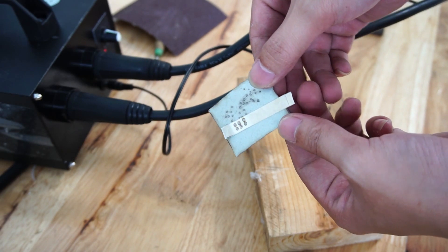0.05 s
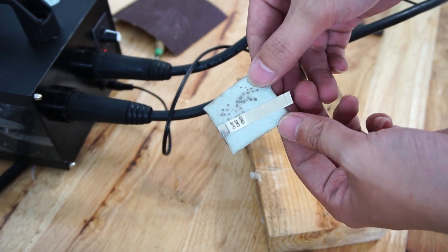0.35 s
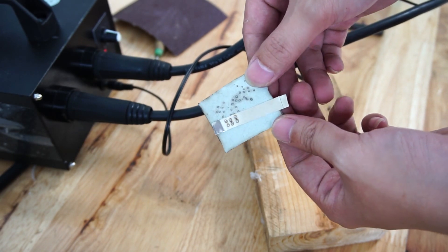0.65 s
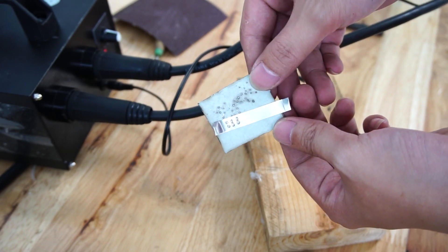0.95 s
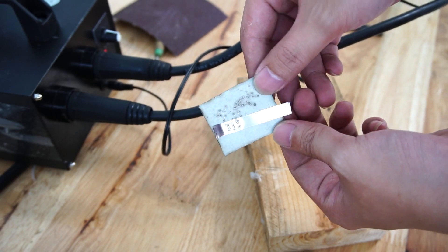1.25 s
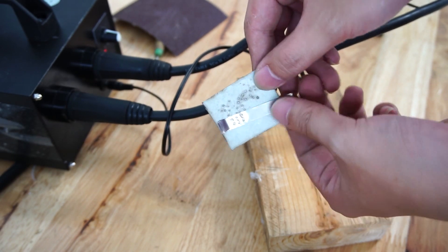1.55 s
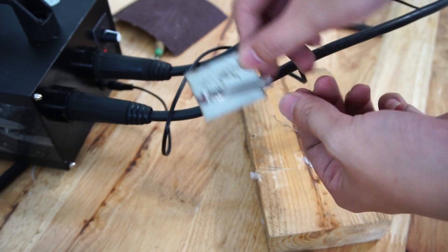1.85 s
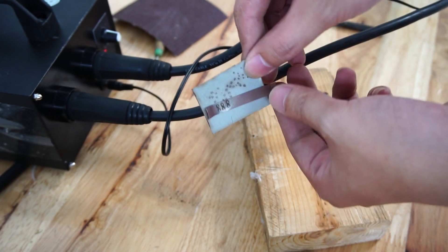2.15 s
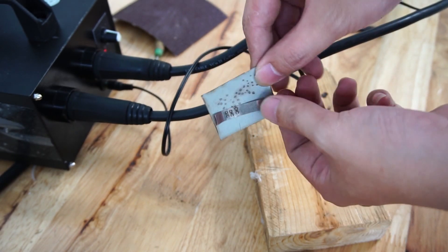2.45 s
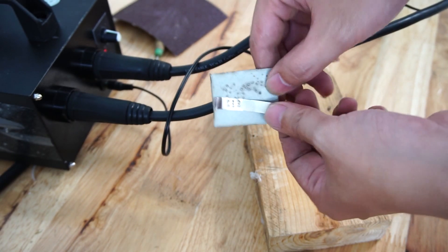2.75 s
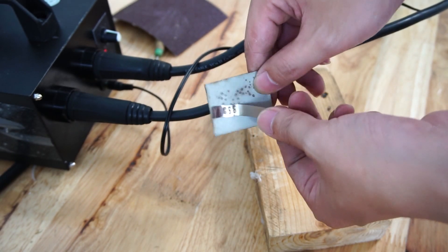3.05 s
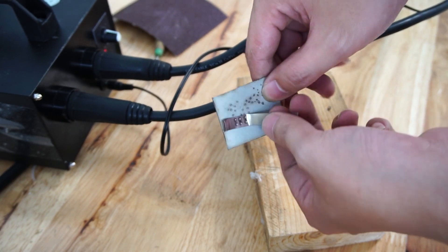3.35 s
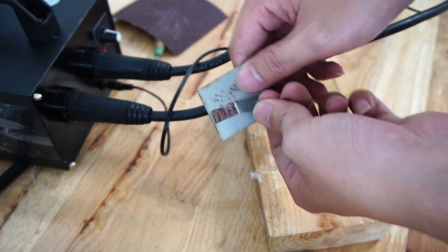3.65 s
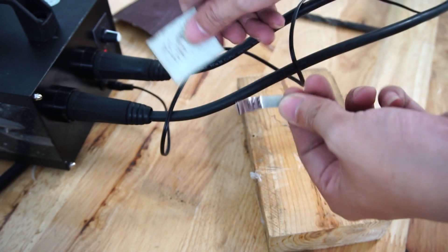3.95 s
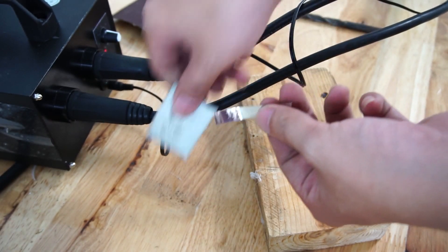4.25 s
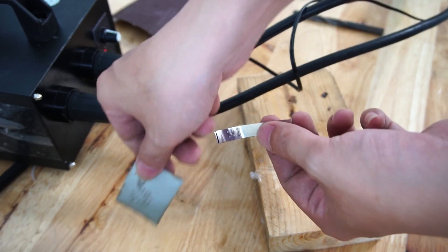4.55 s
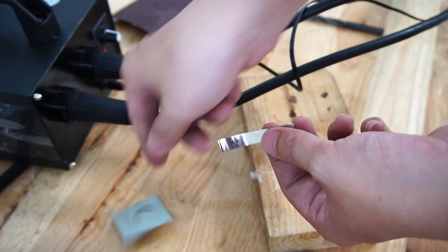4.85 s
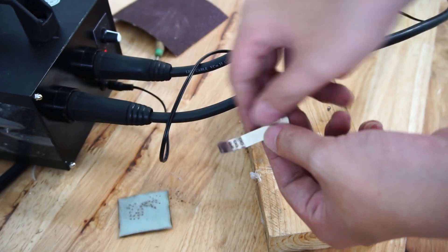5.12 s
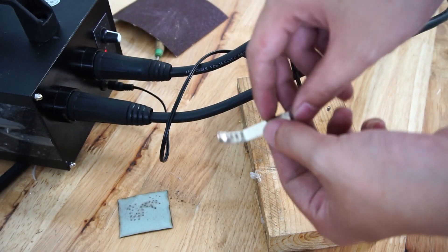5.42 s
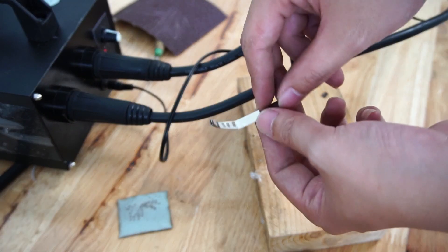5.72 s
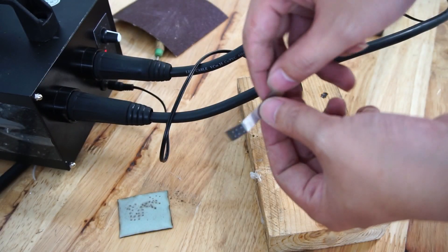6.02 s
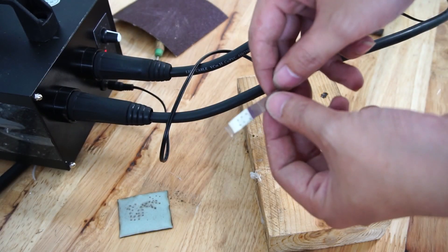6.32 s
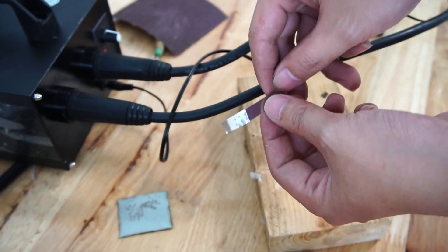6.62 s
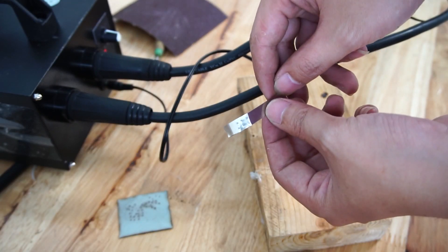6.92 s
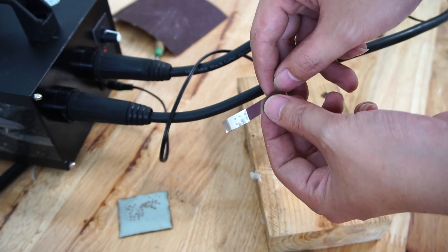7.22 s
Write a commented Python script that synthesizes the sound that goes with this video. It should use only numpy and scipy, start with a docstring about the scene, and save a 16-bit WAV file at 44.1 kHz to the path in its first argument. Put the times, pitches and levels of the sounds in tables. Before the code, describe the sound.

A thin metal strip is pried off a small plate, giving a faint tick, a sharp double snap and, a little later, a quick cluster of crisp snaps. The plate then drops onto a wooden workbench with a knock and rattles brightly, ringing as it settles flat. The sounds are close to the microphone in a slightly echoing room, with a fan rushing and humming softly throughout.

```python
"""In a live, hard-walled room, a thin metal strip is pried off a small plate. Its joints tick and snap, each
release of strain exciting modes that the fingers damp at once. The plate is then dropped on a wooden
workbench and rattles on its edges: every impact knocks the wood and excites bright bending modes.
A fan adds rushing air and a faint hum. The camera's gain control ducks at the loud snaps and recovers
slowly after the rattle."""
import sys
import numpy as np
from scipy import signal
from scipy.fft import rfft, irfft, next_fast_len
from scipy.io import wavfile
from scipy.ndimage import uniform_filter1d

SR = 44100
rng = np.random.default_rng(int(sys.argv[2]) if len(sys.argv) > 2 else 0)


def to_wav(s):
    """Save 16-bit WAV."""
    ch = np.atleast_2d(s).T  # columns
    pcm = np.round(np.clip(ch, -1, 1) * 32767)  # PCM
    wavfile.write(sys.argv[1], SR, pcm.astype(np.int16))


N = 329868

# Impacts on the bench. Each row: start in seconds, force in dB, ring in dB, both about the settling trend.
IMPACTS = [(4.8297, -2.5, -2.5), (4.874, 5, -0.5), (4.901, 8, -2.5), (4.906, -6, 4.5), (4.923, -10, 2),
           (4.949, 2.5, -2.5), (4.977, 4.5, 0.5), (5.0223, 3.5, -5), (5.032, 4, 4), (5.047, -3, 1.5),
           (5.094, -3, -2), (5.119, -2, -3), (5.126, 0.5, 6.5), (5.133, -4, 1.5), (5.161, -3, 1.5),
           (5.182, -10, 7), (5.203, -1.5, 6.5), (5.213, -2.5, 2), (5.236, -9.5, -2), (5.266, 3.5, -0.5),
           (5.278, 0, -3), (5.3007, -5, 2.5), (5.31, 1.5, -3), (5.3392, -2.5, 4), (5.353, 4.5, -5.5),
           (5.371, -2, -10.5), (5.384, -3.5, -7.5)]
# Bending modes. Each row: frequency in Hz, weight within its family in dB, change of that weight
# on settling in dB, left minus right in dB.
PLATE_MODES = [(2406, 0, 0, -5), (2622, -11, 0, 1), (2860, -15, 0, -2), (4630, -18, 0, 1),
               (5169, -10, 13, -1), (5464, -4, 1, 6), (6068, 2, -20, 3), (6944, -18, -3, 4),
               (8518, -13, 3, 0), (8705, -15, 8, 1), (8985, -5, -2, 4), (9815, -6, -1, 3),
               (11995, -4, -3, 1), (12586, -13, 1, 1), (13020, -16, 1, -3), (13090, -11, 2, -1),
               (14082, -6, -6, 1), (14719, -17, 0, -5), (15412, -11, 0, -4)]
# Borders between the low, middle and high mode families. Each entry: frequency in Hz.
FAMILY_BORDERS_HZ = [3500, 7500]
# The three families. Each row: level in dB, change on settling in dB, dB per dB of force,
# change at the first landing in dB.
MODE_FAMILIES = [(-3.5, -33.5, 0.8, 3.5), (-1, -6.5, 0, -1), (1, -3.5, 0.72, -9.5)]
# Spectra of the wood's knock and the edge's click. Each row: frequency in Hz, relative level in dB.
KNOCK_SPECTRUM = [(60, -23.5), (120, -21), (220, -18.5), (380, 3), (580, -4.5), (900, 3.5), (1300, 2),
                  (1700, -1), (2200, -27.5), (4000, -17)]
CLICK_SPECTRUM = [(300, -43.5), (1500, -3), (3500, 3), (7500, 3), (10000, 3), (16000, 2.5)]
# Joints giving way. Each row: start in seconds, ring in dB, crack in dB, crack tilt in dB per octave,
# most excited frequency in Hz.
JOINT_SNAPS = [(0.7613, -39.5, -28, -6.5, 8400), (1.771, -54, -43, 0, 13020), (1.8449, -44, -21.5, 2, 9070),
               (1.8478, -11.5, -6.5, 1.5, 8900), (1.8533, -10.5, -2.5, 4.5, 8900),
               (3.3086, -40, -41, -4.5, 8700), (3.499, -45.5, -54, -0.5, 9900),
               (3.6872, -18.5, -8.5, 0.5, 9400), (3.702, -13, 0.5, -0.5, 11600),
               (3.7301, -19, -2.5, 3, 12370), (3.8153, -4, 1, 3, 12500)]
# Modes of the pinched strip. Each row: frequency in Hz, relative level in dB.
STRIP_MODES = [(1350, -12), (2420, -2.5), (2540, -12.5), (4450, -19), (6630, -15), (8880, -4.5),
               (11100, -22), (11600, -14), (12280, -5), (12600, 4), (14100, -1)]
# Damping by the fingers. Each row: frequency in Hz, 60 dB decay time in seconds.
STRIP_DECAY = [(2400, 0.017), (4450, 0.015), (8900, 0.02), (12400, 0.0095), (14100, 0.0086)]
# Spectra of a crack, the fan's air and the reverberation. Each row: frequency in Hz, relative level in dB.
CRACK_SPECTRUM = [(200, -17), (700, -29), (1400, -8), (2000, -30), (2700, 2), (6000, 1.5), (10000, -0.5),
                  (13000, 9), (16000, 2.5)]
AIR_SPECTRUM = [(25, -39.5), (60, -28), (120, -22), (200, -16.5), (300, -11.5), (420, -5.5), (600, -7),
                (800, -5), (1020, -4.5), (1250, -6.5), (1650, -5), (2200, -9), (6500, -20.5), (10000, -29),
                (16000, -34.5)]
ROOM_SPECTRUM = [(100, -9), (1000, 8), (5000, 2.5), (9000, 1.5), (15000, 0.5)]
# Tones of the fan's motor. Each row: frequency in Hz, level in dB.
MOTOR_TONES = [(78, -83), (96.9, -75)]
# Resonances of the fan's housing. Each row: frequency in Hz, level in dB, bandwidth in Hz.
HOUSING_MODES = [(201, -77, 10), (288.7, -70, 6.3), (1026, -60, 46), (1587, -66, 64)]
# Reverberation time. Each row: frequency in Hz, 60 dB decay time in seconds.
ROOM_DECAY = [(200, 0.51), (1000, 1), (2500, 0.96), (5400, 0.8), (6500, 0.87), (9000, 0.69), (12500, 0.47),
              (16000, 0.37)]
# Likeness of left and right. Each row: frequency in Hz, correlation from 0 to 1.
COHERENCE = [(60, 0.78), (180, 0.98), (550, 0.91), (1650, 0.64), (4970, 0.046), (15000, 0.24)]
# Threshold of the noise suppressor. Each row: frequency in Hz, power density in dB (per Hz).
SUPPRESSOR_THRESHOLD = [(60, -99), (200, -91), (500, -92.5), (1500, -102), (5000, -109), (8000, -108),
                        (11000, -106), (16000, -109)]

REST_S = 5.393  # the plate lies flat
KNOCK_DB, KNOCK_SETTLE_DB = -17.5, -8.5  # at first, and the change by the time it lies flat
CLICK_DB, CLICK_SETTLE_DB = 6, -14.5
LANDING_DB = 20.5  # extra knock of the first landing, which carries the whole fall
LANDING_CUT_HZ, BOUNCE_CUT_HZ = 130, 280  # the landing shakes the bench lower than the bounces do
FREE_T60_S, STOP_T60_S, RING_ATTACK_S = 2.5, 0.0035, 0.0028  # ring in the air, cut by contact, its onset
CLICK_T60_S, KNOCK_T60_S, CRACK_T60_S = 0.016, 0.1, 0.0095
TOUCHES_PER_S, FLAT_TOUCHES_PER_S = 30, 280  # light touches: at first, and added when nearly flat
SKID_RING_DB, SKID_CLICK_DB = -7.5, -9  # a light touch against a full impact
NEAR_DB, NEAR_WIDTH = 11, 0.12  # emphasis around a snap's most excited frequency, its relative width
BLADE_DB, SWELL_DB, SWELL_AT_S, SWELL_WIDTH_S = -61.5, 9, 1.46, 0.31  # the blade tone swells once


def plate():
    """Impact excitation: bending modes ring freely in each hop until the next contact stops them.
    As the plate settles, knocks and clicks soften and the low modes die away; the upper ones ring on."""
    out, t = np.zeros((2, N)), np.arange(SR // 5) / SR
    hz, mode_db, settle_db, pan_db = np.transpose(PLATE_MODES)
    family = np.searchsorted(FAMILY_BORDERS_HZ, hz)
    first = IMPACTS[0][0]
    ends = [row[0] for row in IMPACTS[1:]] + [REST_S]
    for (start, force_db, ring_db), end in zip(IMPACTS, ends):
        settled, landing = (start - first) / (REST_S - first), float(start == first)
        family_db = ring_db + np.array(MODE_FAMILIES) @ [1, settled, force_db, landing]
        # The point of contact decides how a family's energy is shared among its modes.
        share = amp(mode_db + settled * settle_db + 3 * rng.standard_normal(len(hz))) ** 2
        share /= np.bincount(family, share)[family]
        level_db = family_db[family] + 10 * np.log10(share)
        beam_db = pan_db + 2.5 * rng.standard_normal(len(hz))  # tumbling beams each mode differently
        stopped = fade(np.maximum(t - (end - start), 0), STOP_T60_S)
        hop = (1 - fade(t, RING_ATTACK_S)) * fade(t, FREE_T60_S) * stopped
        add(out, start, hop * ring(hz, level_db, t, beam_db, spread_rad=0.28))
        skid = skidding_edge(t, end - start, rate=TOUCHES_PER_S + FLAT_TOUCHES_PER_S * settled ** 2)
        jangle = amp(SKID_RING_DB) * skid * ring(hz, level_db, t, beam_db, spread_rad=0.45)
        add(out, start, small_source(jangle, corner_hz=401))
        touch = amp(force_db) * fade(t, CLICK_T60_S) + amp(SKID_CLICK_DB) * skid
        click = amp(CLICK_DB + CLICK_SETTLE_DB * settled) * touch * noise(CLICK_SPECTRUM, len(t))
        add(out, start, small_source(click, corner_hz=250))
        add(out, start, bench_knock(t, force_db, settled, landing))
    return out


def skidding_edge(t, hop_s, rate):
    """A Poisson process: light touches at random moments of one hop sum to an envelope of brief decays."""
    touches = (rng.random(len(t)) < rate / SR) * (t < hop_s)
    strength = amp(3 * rng.standard_normal(len(t)))
    return signal.fftconvolve(touches * strength, fade(t, t60=0.011))[:len(t)]


def bench_knock(t, force_db, settled, landing):
    """Heavy damping: struck wood answers with a short burst of coloured noise."""
    level_db = KNOCK_DB + KNOCK_SETTLE_DB * settled + LANDING_DB * landing + force_db / 2
    knock = amp(level_db) * fade(t, KNOCK_T60_S) * noise(KNOCK_SPECTRUM, len(t))
    return small_source(knock, corner_hz=LANDING_CUT_HZ if landing else BOUNCE_CUT_HZ)


def strip():
    """Sudden release of strain: each joint cracks and excites modes that the fingers damp at once."""
    out, t = np.zeros((2, N)), np.arange(SR // 10) / SR
    hz, mode_db = np.transpose(STRIP_MODES)
    damping = fade(t, along(STRIP_DECAY, hz)[:, None])
    for start, ring_db, crack_db, tilt_db, centre_hz in JOINT_SNAPS:
        near = np.exp(-(np.log(hz / centre_hz) / NEAR_WIDTH) ** 2)
        level_db = mode_db + NEAR_DB * near
        level_db -= 10 * np.log10(np.sum(amp(level_db) ** 2))  # unit total power
        tone = ring(hz, level_db, t, pan_db=0, spread_rad=0.35, decay=damping)
        crack = noise([(f, db + tilt_db * np.log2(f)) for f, db in CRACK_SPECTRUM], len(t))
        add(out, start, amp(ring_db) * tone + amp(crack_db) * crack * fade(t, CRACK_T60_S))
    return small_source(out, corner_hz=400)


def fan():
    """Broadband flow noise with a wavering blade tone, housing resonances and a faint motor hum."""
    t = np.arange(N) / SR
    swell = np.exp(-((t - SWELL_AT_S) / SWELL_WIDTH_S) ** 2)
    blade = amp(BLADE_DB + SWELL_DB * swell) * resonance(centre_hz=436, width_hz=13)
    housing = sum(amp(db) * resonance(hz, width) for hz, db, width in HOUSING_MODES)
    motor = sum(amp(db) * np.sqrt(2) * np.sin(2 * np.pi * (hz * t + rng.random()))
                for hz, db in MOTOR_TONES)
    air = amp(-45) * noise(AIR_SPECTRUM, N)
    return (air + blade + housing + motor) * amp([[-0.6], [0.6]])


def room(x, wet_db):
    """Reverberation: wall reflections build up in milliseconds and last longest in the midrange."""
    hz, t, spectra = signal.stft(noise(ROOM_SPECTRUM, SR), SR, nperseg=256)
    envelope = fade(t, along(ROOM_DECAY, hz)[:, None]) * (1 - fade(t, 0.03))
    tail = signal.istft(spectra * envelope, SR, nperseg=256)[1]
    tail /= np.linalg.norm(tail[0])
    return amp(wet_db) * signal.fftconvolve(x, tail, axes=1)[:, :N]


def ring(hz, db, t, pan_db, spread_rad, decay=1):
    """Modal superposition: each mode reaches the two microphones with its own strength and phase."""
    lag = spread_rad * rng.standard_normal((len(hz), 1))
    phase = 2 * np.pi * (hz[:, None] * t + rng.random((len(hz), 1)))
    channels = [amp(db + side * pan_db / 2) @ (decay * np.sin(phase + side * lag)) for side in (1, -1)]
    return np.sqrt(2) * np.array(channels)


def noise(spectrum, size):
    """Partial coherence: coloured stereo noise of rms 1, alike in the bass, much less so in the treble."""
    def response(hz):
        angle = np.arccos(np.clip(along(COHERENCE, hz), -1, 1)) / 2
        return amp(along(spectrum, hz)) * [np.cos(angle), np.sin(angle)]
    mid, side = filtered(rng.standard_normal((2, size)), response)
    return unit(np.array([mid + side, mid - side]))


def resonance(centre_hz, width_hz):
    """Random excitation of a resonance gives a wavering tone, here of rms 1."""
    peak = lambda hz: 1 / (1 + (2 * (hz - centre_hz) / width_hz) ** 2)
    return unit(filtered(rng.standard_normal(N), peak))


def small_source(x, corner_hz):
    """Radiation efficiency: an object small against the wavelength gives little bass."""
    return signal.sosfilt(signal.butter(2, corner_hz, "highpass", fs=SR, output="sos"), x)


def amp(db):
    """Decibels as an amplitude ratio."""
    return 10 ** (np.asarray(db) / 20)


def unit(x):
    """Normalisation to rms 1."""
    return x / np.sqrt(np.mean(x ** 2) + 1e-20)


def along(points, hz):
    """Interpolation of (Hz, value) points on a logarithmic frequency axis."""
    point_hz, values = np.transpose(points)
    return np.interp(np.log(hz + 1), np.log(point_hz + 1), values)


def filtered(x, response):
    """Linear filtering: the spectrum is multiplied by a frequency response."""
    size = x.shape[-1]
    padded = next_fast_len(size + 8192)
    return irfft(rfft(x, padded) * response(np.fft.rfftfreq(padded, 1 / SR)), padded)[..., :size]


def fade(t, t60):
    """Exponential decay of 60 dB in t60 seconds."""
    return np.exp(-np.log(1000) * t / t60)


def add(track, start_s, sound):
    """Superposition of a sound on the track."""
    i = round(start_s * SR)
    track[:, i:i + sound.shape[1]] += sound[:, :N - i]


def scene():
    """Direct and reverberant sound add: plate and strip close by, the strip to the right, the fan beyond."""
    snaps, rattle = strip(), plate()
    snaps_in_room = snaps * amp([[-2.2], [2.2]]) + room(snaps, wet_db=-7.5) * amp([[-0.7], [0.7]])
    return snaps_in_room + rattle + room(rattle, wet_db=-9) + fan()


def gain_control(x, limit_db, slope, release_db_per_s, charge_s, recover_s):
    """Compression: a fast limiter with a slow memory that long, loud sounds charge up."""
    block = 32
    dt = block / SR
    sensed = signal.lfilter([1, -0.35], 1, x)  # the detector reacts most to treble
    power = np.abs(uniform_filter1d(np.mean(sensed ** 2, axis=0), size=96))[::block]
    excess_db = np.maximum(10 * np.log10(power + 1e-12) - limit_db, 0)
    fast, slow, cut_db = 0, 0, []
    for need in slope * excess_db:
        fast = max(need, fast - release_db_per_s * dt)
        slow += (fast - slow) * dt / charge_s if need > slow else -slow * dt / recover_s
        cut_db.append(max(fast, slow))
    smooth_db = uniform_filter1d(cut_db, size=3)
    return x * amp(-np.interp(np.arange(N), np.arange(len(cut_db)) * block, smooth_db))


def noise_suppressor(x):
    """Downward expansion: bands that sink towards the threshold are turned down further."""
    hz, _, spectra = signal.stft(x, SR, nperseg=1024, scaling="psd")
    power = 2 * np.mean(np.abs(spectra) ** 2, axis=0)
    power = uniform_filter1d(power, size=3, axis=0)  # smoothed over frequency, then over time
    power = np.abs(uniform_filter1d(power, size=9, axis=1))
    gain = np.sqrt(power / (power + amp(along(SUPPRESSOR_THRESHOLD, hz))[:, None] ** 2))
    return signal.istft(spectra * gain, SR, nperseg=1024, scaling="psd")[1][:, :N]


def record(dry):
    """The camera's signal chain: compression, noise suppression and a band limit near 16 kHz."""
    held = gain_control(dry, limit_db=-17.5, slope=0.9, release_db_per_s=96.5, charge_s=0.3, recover_s=3.36)
    return filtered(noise_suppressor(held), lambda hz: np.clip((16050 - hz) / 300, 0, 1))


dry = scene()
out = record(dry)
to_wav(out)
```